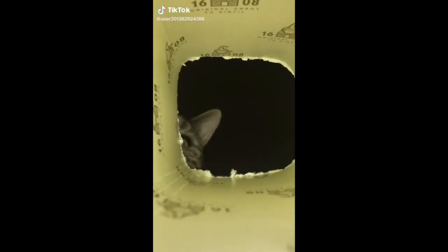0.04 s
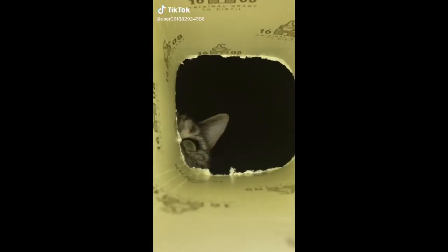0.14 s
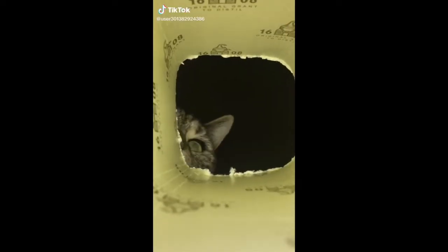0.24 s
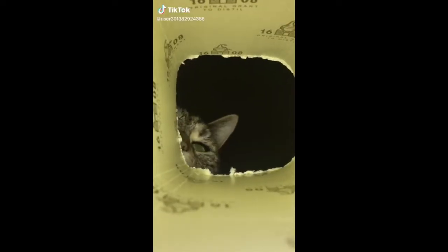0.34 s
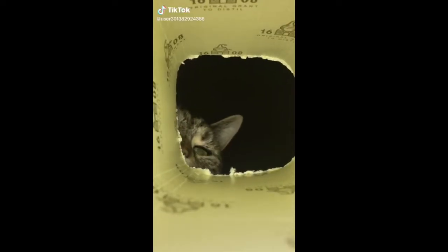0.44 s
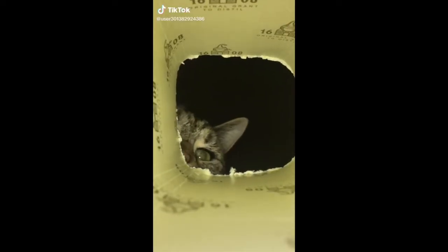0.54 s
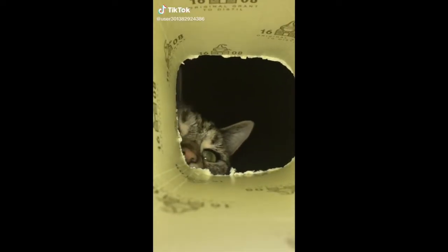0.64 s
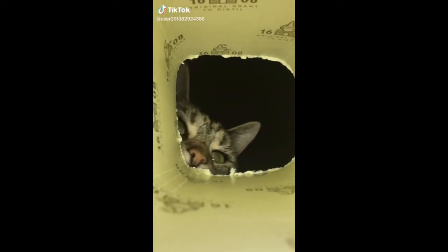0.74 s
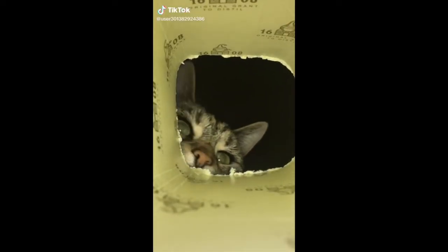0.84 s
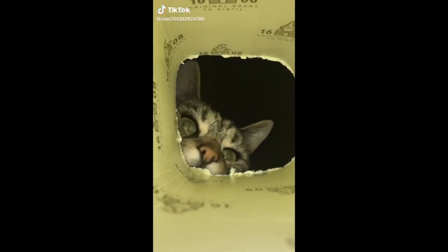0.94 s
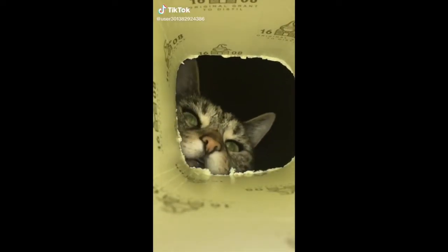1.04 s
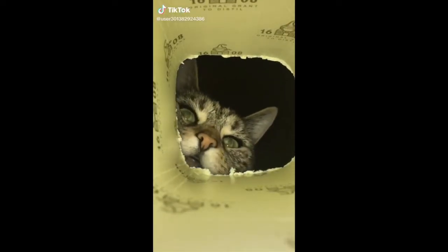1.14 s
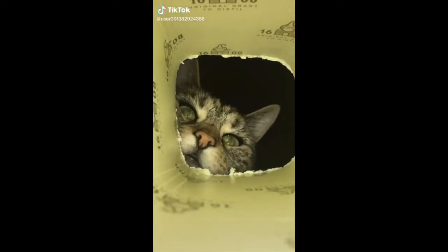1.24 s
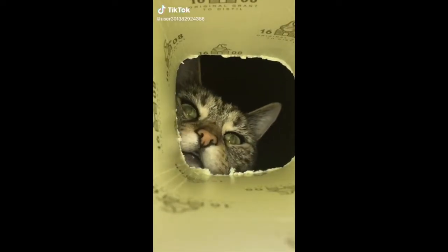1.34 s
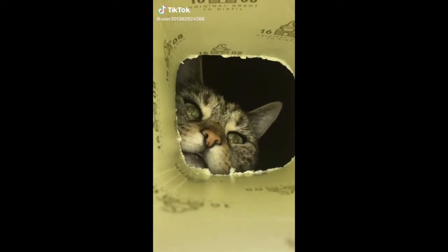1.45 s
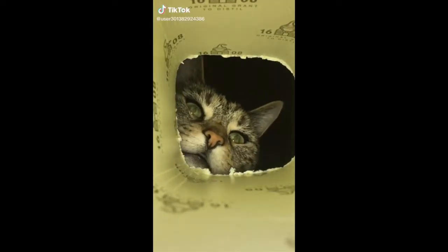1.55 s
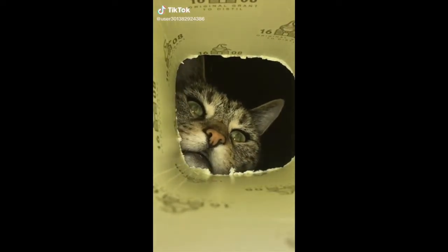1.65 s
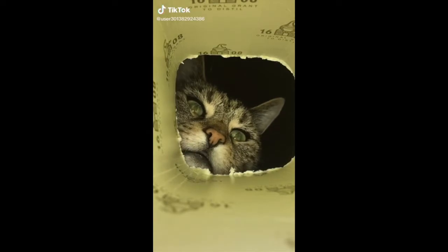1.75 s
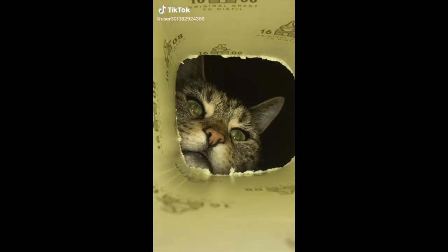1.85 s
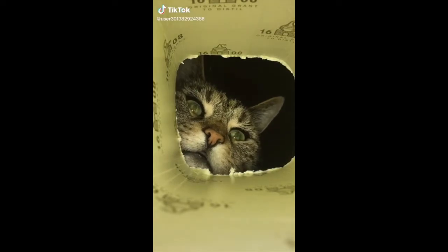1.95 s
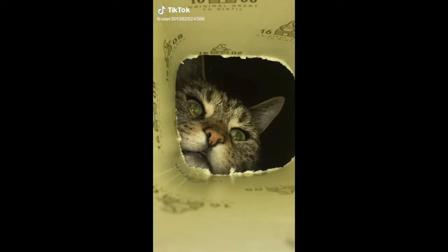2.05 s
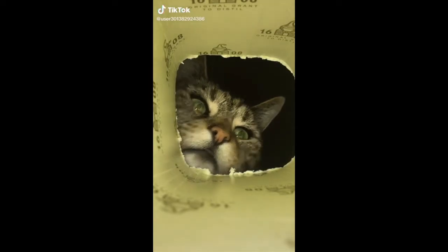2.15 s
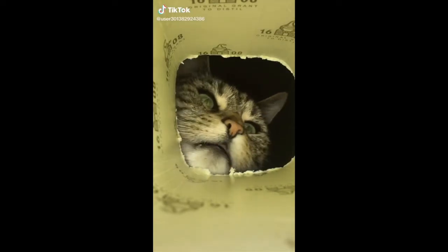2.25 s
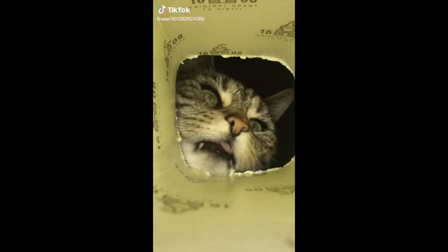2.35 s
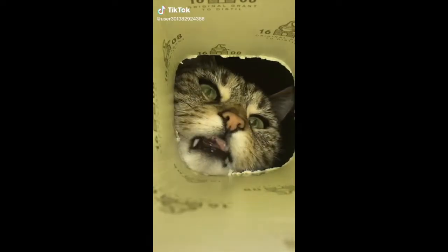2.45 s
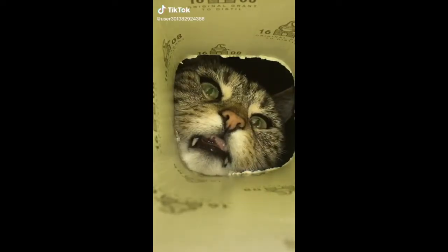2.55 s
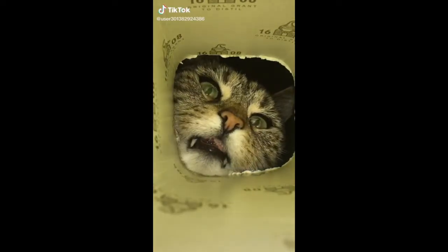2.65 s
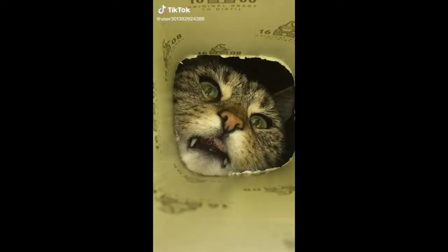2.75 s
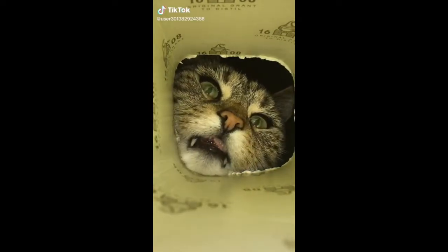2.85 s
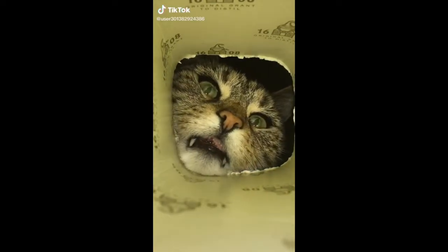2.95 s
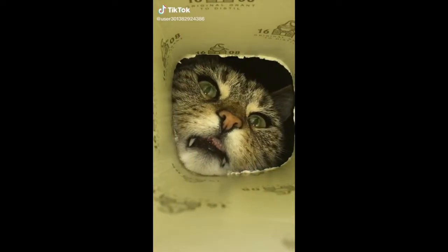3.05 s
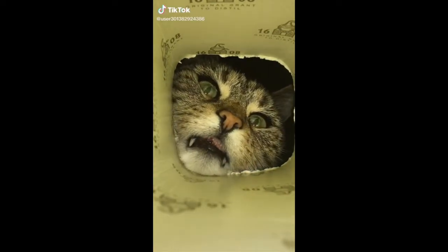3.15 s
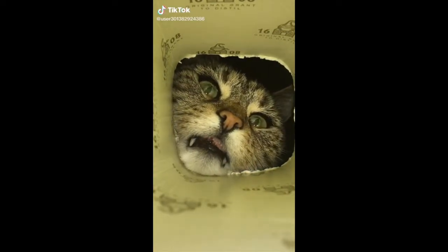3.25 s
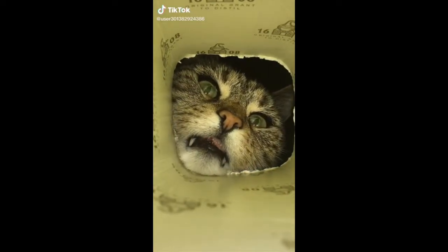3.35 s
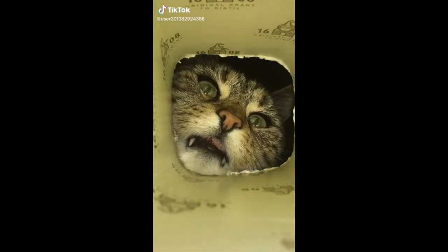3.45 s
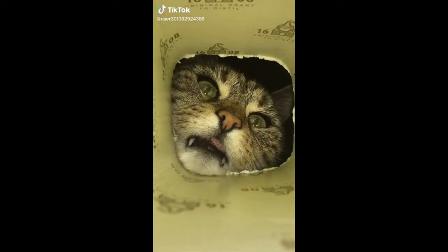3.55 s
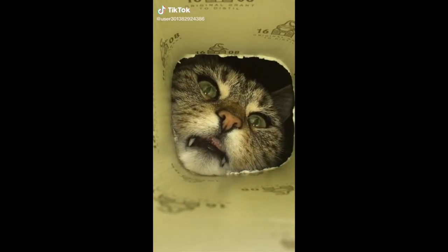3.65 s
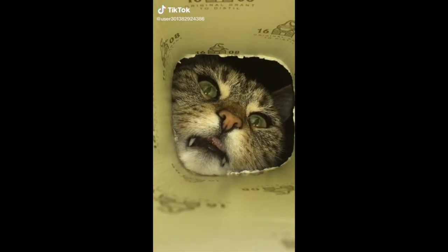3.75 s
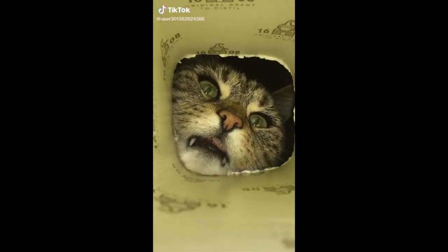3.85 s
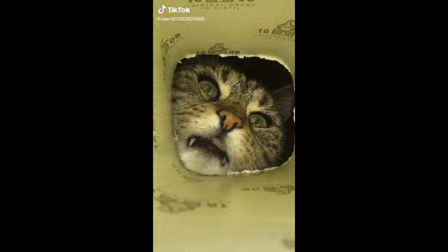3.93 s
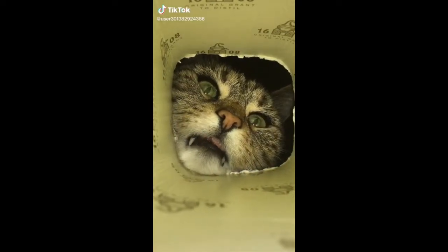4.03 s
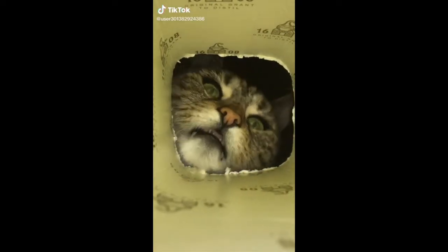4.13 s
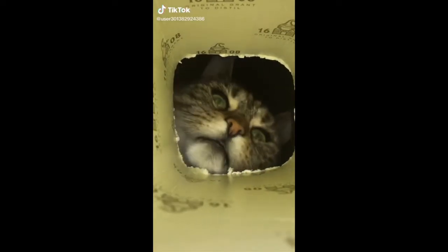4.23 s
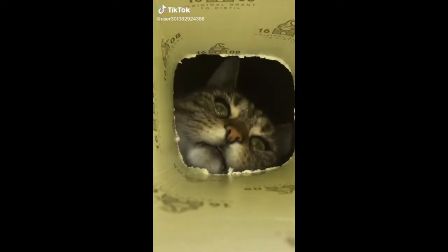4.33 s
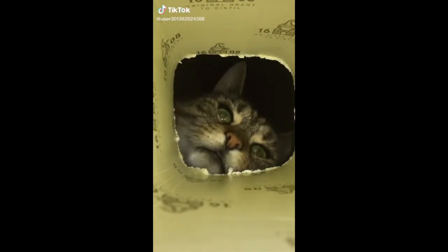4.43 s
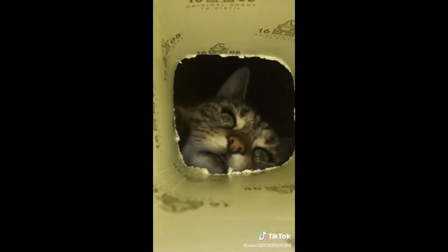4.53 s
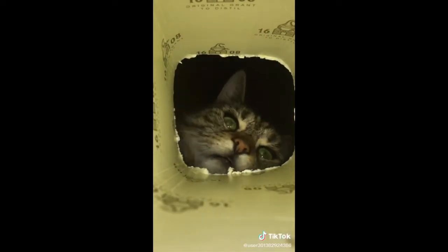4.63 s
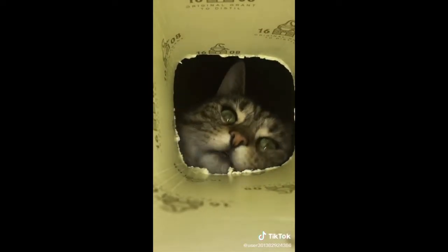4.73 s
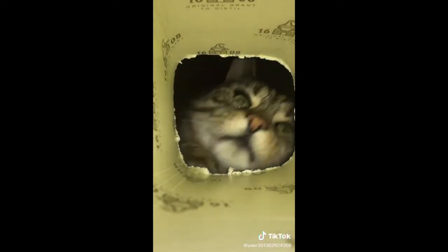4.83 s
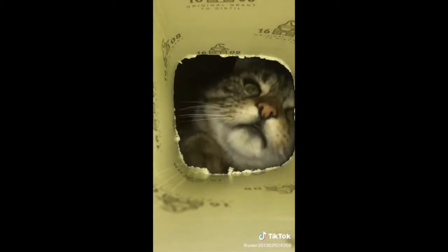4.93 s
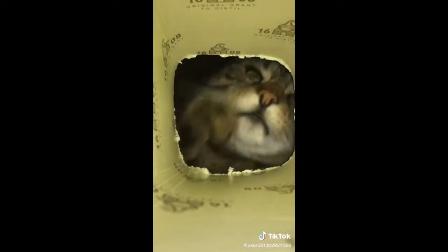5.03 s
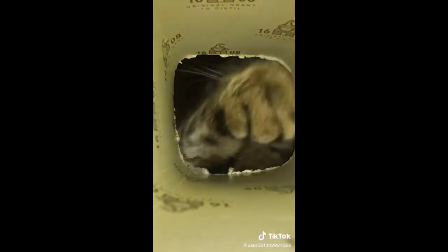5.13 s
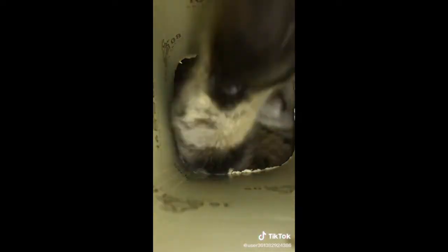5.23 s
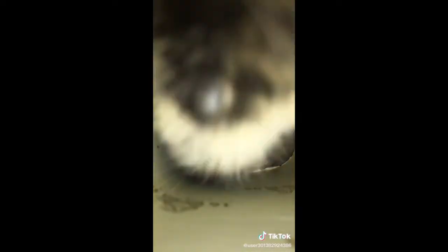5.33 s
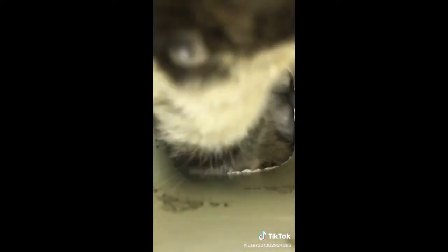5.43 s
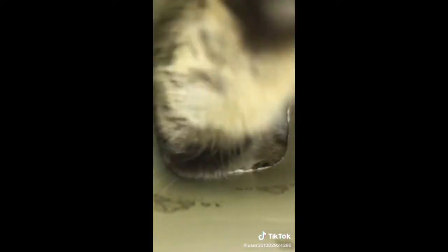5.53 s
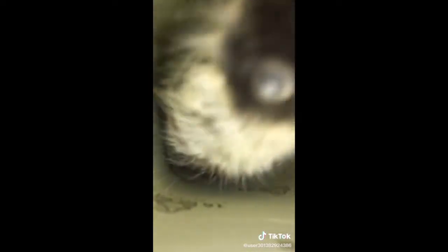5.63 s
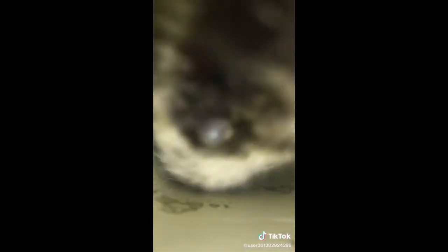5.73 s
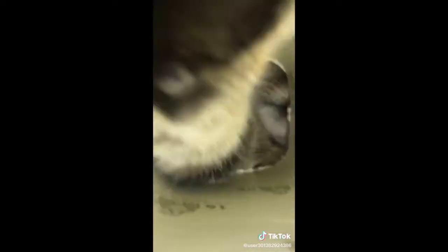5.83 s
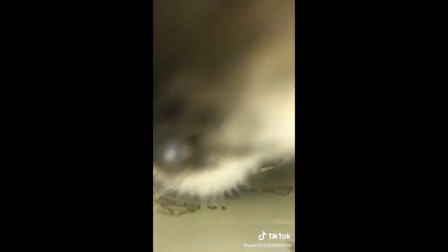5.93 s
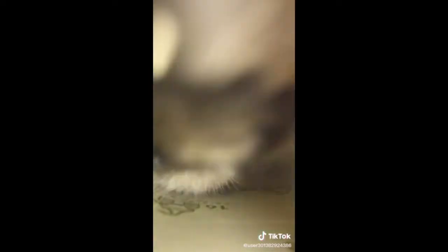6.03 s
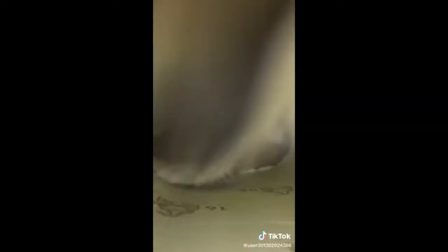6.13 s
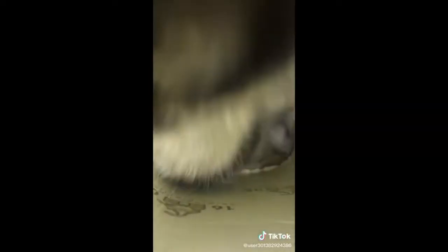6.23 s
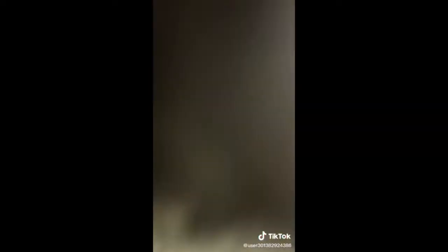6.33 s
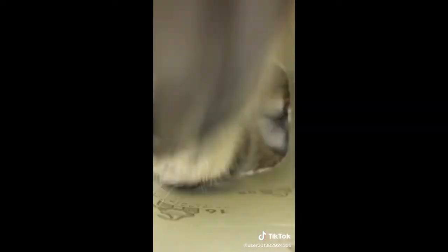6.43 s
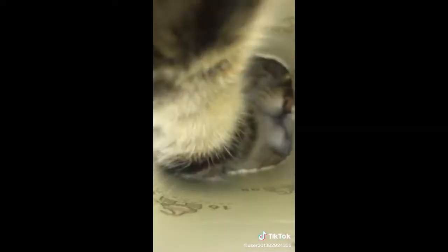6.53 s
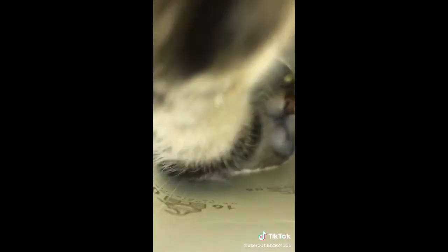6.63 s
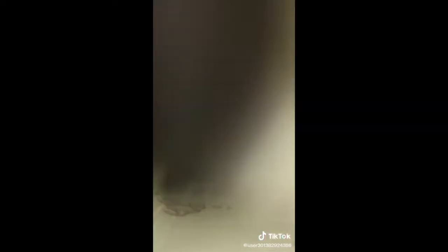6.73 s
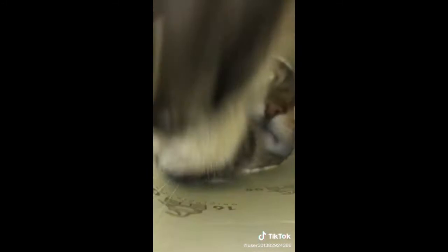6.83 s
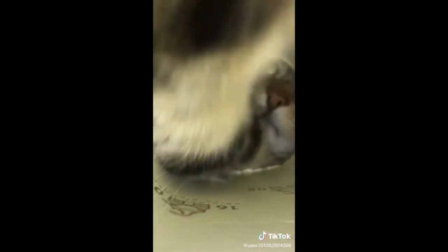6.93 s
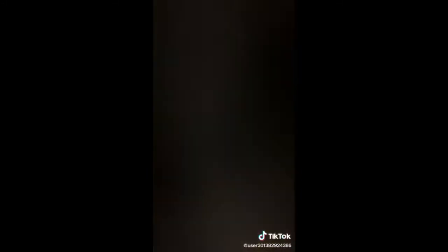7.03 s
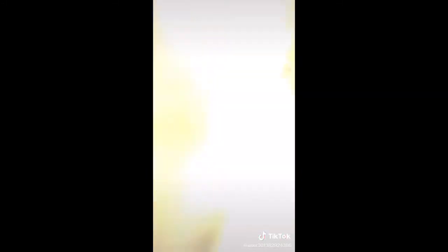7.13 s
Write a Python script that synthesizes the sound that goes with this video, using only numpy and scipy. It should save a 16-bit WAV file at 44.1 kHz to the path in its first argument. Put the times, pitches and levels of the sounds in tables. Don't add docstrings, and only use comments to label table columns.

```python
import sys
import numpy as np
from scipy import signal
from scipy.fft import rfft, irfft, next_fast_len
from scipy.io import wavfile
from scipy.ndimage import uniform_filter1d

SR = 44100
rng = np.random.default_rng(int(sys.argv[2]) if len(sys.argv) > 2 else 0)


def makeup_ratio(level_db):
    decades = np.asarray(level_db, float) / 20
    return 10 ** decades


def materialize(psi):
    bounded = np.clip(np.atleast_2d(psi).T, -1, 1)
    quanta = np.round(bounded * 32767).astype(np.int16)
    wavfile.write(sys.argv[1], SR, quanta)


N = 316638
FFT_SIZE = next_fast_len(N)
TOP_HZ = 13350
BLOCK = 64


def rms_one(x):
    return x / np.sqrt(np.mean(x ** 2) + 1e-20)


def in_time(rows):
    s, *columns = np.transpose(rows)
    return [np.interp(np.arange(N) / SR, s, c) for c in columns]


def band(x, low_hz, high_hz):
    return signal.sosfilt(signal.butter(2, [low_hz, high_hz], "band", fs=SR, output="sos"), x)


def resonance(x, hz, width):
    r = np.exp(-np.pi * width / SR)
    top = (1 - r * r) / 2
    return signal.lfilter([top, 0, -top], [1, -2 * r * np.cos(2 * np.pi * hz / SR), r * r], x)


def ring(x, hz, t60):
    r, w = makeup_ratio(-60 / (t60 * SR)), 2 * np.pi * hz / SR
    return signal.lfilter([0, np.sin(w)], [1, -2 * r * np.cos(w), r * r], x)


def drift(rate):
    r = np.exp(-2 * np.pi * rate / SR)
    noise = rng.standard_normal(N + SR)
    return rms_one(signal.lfilter([1], [1, -2 * r, r * r], noise)[SR:])


def coloured(x, spectrum, peaks=()):
    hz = np.maximum(np.fft.rfftfreq(FFT_SIZE, 1 / SR), 1)
    points = np.array(spectrum)
    db = np.interp(np.log(hz), np.log(points[:, 0]), points[:, 1])
    for peak_hz, width, lift_db in peaks:
        db = db + lift_db / (1 + (2 * (hz - peak_hz) / width) ** 2)
    return irfft(rfft(x, FFT_SIZE) * makeup_ratio(db) * (hz < TOP_HZ), FFT_SIZE)[:N]


def add(out, s, sound, peak_db):
    i = max(round(s * SR), 0)
    piece = sound[:N - i]
    out[i:i + len(piece)] += makeup_ratio(peak_db) * piece / np.max(np.abs(sound))


# pitch_hz, level_db (per Hz)
ROOM_COLOUR = [(20, -16), (40, -2), (82, 4.5), (241, -18), (516, -27), (829, -27.5), (1300, -20),
               (3000, -44.5), (6000, -46), (13800, -45.5)]
# pitch_hz, width_hz, lift_db
BOX_AIR = [(257.6, 86, 7), (457, 56, -6.5), (660, 90, 10), (1347, 220, 4), (2350, 82, 11),
           (2600, 102, 10.5), (3176, 170, 6.5), (3660, 62, 8), (5180, 120, 7), (6840, 1600, 9.5)]


def room():
    air = rms_one(coloured(rng.standard_normal(N), ROOM_COLOUR, BOX_AIR))
    hum_hz, width_hz = 87.5, 27
    hum = resonance(rng.standard_normal(N), hum_hz, width_hz)
    hum = rms_one(resonance(hum, hum_hz, width_hz))
    return air * makeup_ratio(-66 + 2.0 * drift(1.2)) + makeup_ratio(-65) * hum


# start_s, length_s, top_pitch_hz, level_db, pitch_arch (0-1)
SQUEAKS = [
    (0.33, 0.2, 605, -64.5, .3),
    (1.87, 0.14, 380, -63.5, .1),
    (7.115, 0.092, 285, -33.5, .1),
    (6.996, .028, 250, -33.5, 0.11),
    (.24, .06, 250, -55, .1),
]


def squeaks():
    out = np.zeros(N)
    for s, length, hz, db, arch in SQUEAKS:
        along = np.linspace(0, 1, round(length * SR))
        pitch = hz * (1 - arch * (along - .42) ** 2)
        add(out, s, np.sin(np.pi * along) * np.sin(2 * np.pi * np.cumsum(pitch) / SR), db)
    return out


# start_s, peak_db, pitch_hz, ring_s (time to fall 60 dB)
PINGS = [(1.219, -37, 690, 0.037), (4.208, -47.5, 1365, .04), (4.24, -52, 1340, 0.037),
         (4.417, -48, 2360, 0.073), (4.418, -59, 3600, 0.045), (4.47, -58, 2350, 0.041),
         (4.771, -43, 69.9, .12), (4.929, -46, 65.4, 0.14), (5.455, -46, 2400, .012),
         (5.7405, -32, 520, .02), (6.806, -36, 1440, .04), (5.481, -30, 680, .035), (5.648, -23, 650, .025),
         (5.343, -32, 480, .03), (6.115, -33, 700, .015), (5.7955, -13.5, 200, 0.013)]


def pings():
    out, t = np.zeros(N), np.arange(8000) / SR
    for s, db, hz, t60 in PINGS:
        add(out, s, ring(np.exp(-4 * t * hz), hz, t60), db)
    return out


# pitch_hz, level_db, ring_s
PANEL_MODES = [(61.4, -5, 0.055), (100.5, -5.5, 0.079), (141, -1.5, 0.037), (202, -6, 0.042),
               (270.5, 2, 0.041), (376.6, 3.5, 0.024), (616, -2, 0.027)]


def panels(push, centre_hz, spread, free=1):
    out = 0
    for hz, db, t60 in PANEL_MODES:
        distance = spread * np.log2(hz / centre_hz)
        out = out + makeup_ratio(db - distance ** 2) * ring(push, hz, free * t60)
    return out


# start_s, slips_per_s, level_db, unevenness (0-1)
CREAK = [
    (0, 220, -23.5, 1),
    (.014, 230, -25, 0.8),
    (.03, 205, -18, 0.64),
    (.042, 206, -21, 0.25),
    (.055, 213, -19.5, 0.09),
    (.095, 203, -25, 0.02),
    (.105, 172, -36, 0.33),
    (.14, 180, -48, 0.36),
]
# start_s, strength_db
CATCHES = [
    (.0165, 6),
    (.0235, 10),
    (.026, 7),
    (.0325, 9),
    (.038, 5),
    (.040, 8),
    (.0428, 8),
]
# pitch_hz, width_hz, level_db
FLAP_TONE = [(109, 56, -7.5), (273, 152, -1), (403, 41, 5.5), (607, 150, -24), (850, 120, -10),
             (1220, 69, -13.5), (1515, 130, -16.5), (2060, 110, -25), (2320, 65, -19.5), (2635, 43, -22),
             (3240, 540, -26), (6660, 3400, -34.5)]


def creak():
    size = round(CREAK[-1][0] * SR)
    per_s, level_db, uneven = (c[:size] for c in in_time(CREAK))
    wander = signal.lfilter([.01], [1, -.99], rng.standard_normal(size)) * 14
    beats = np.cumsum(per_s * (1 + .5 * uneven * wander)) / SR
    slips = np.diff(np.floor(beats + .995), prepend=0) > 0
    extra = rng.random(size) < 900 * np.clip(uneven, 0, 1) / SR
    clicks = slips * makeup_ratio(5.0 * uneven * rng.standard_normal(size))
    clicks = clicks + extra * rng.standard_normal(size) * 0.8 * uneven
    jolts = 0.5 * slips
    for s, db in CATCHES:
        jolts[round(s * SR)] = makeup_ratio(db)
    grit = rng.standard_normal(size) * signal.lfilter([1], [1, -.995], np.abs(clicks)) * .6
    body = np.zeros(size)
    for k, (hz, width, db) in enumerate(FLAP_TONE):
        source = clicks + 0.39 * (hz > 1000) * grit
        tone = rms_one(resonance(resonance(source, hz, 3 * width), hz, width))
        body += (-1) ** k * makeup_ratio(db) * tone
    body = body + 0.93 * uneven * rms_one(panels(clicks, 220, spread=5.2))
    body = body - 0.16 * rms_one(band(band(jolts, 250, 1430), 150, 1600))
    even = np.sqrt(uniform_filter1d(body ** 2, size=600) + 1e-9)
    stop = np.clip((size - np.arange(size)) / 300, 0, 1)
    return np.pad(makeup_ratio(level_db) * body / even * stop, (0, N - size))


def friction(tone, peaks, per_s, grit_db, flicker_db):
    sizes = makeup_ratio(grit_db * np.minimum(rng.exponential(1, N), 5)) * rng.choice([-1, 1], N)
    clicks = sizes * (rng.random(N) < per_s / SR)
    grains = rfft(coloured(clicks, tone, peaks), FFT_SIZE)
    hz, shared = np.fft.rfftfreq(FFT_SIZE, 1 / SR), drift(25)
    low = 1 / (1 + (hz / 870) ** 6)
    high = 1 / (1 + (4600 / (hz + 1)) ** 8)
    ranges = []
    for share in (1 - low - high, high, low):
        flicker = makeup_ratio(flicker_db * (shared + drift(37)))
        ranges.append(rms_one(irfft(grains * share, FFT_SIZE)[:N] * flicker))
    return ranges


def patchy(x, lean_db, patch_db):
    hz, spectrum = np.fft.rfftfreq(FFT_SIZE, 1 / SR) + 1, rfft(x, FFT_SIZE)
    centres = np.linspace(np.log(800), np.log(5000), 12)
    total, power = 0, 0
    for one, side in zip(np.eye(12), np.linspace(-1, 1, 12)):
        part = irfft(spectrum * np.interp(np.log(hz), centres, one), FFT_SIZE)[:N]
        gain = makeup_ratio(lean_db * side + patch_db * drift(9.6))
        total = total + gain * part
        power = power + gain ** 2 * np.mean(part ** 2)
    return rms_one(total / np.sqrt(power))


def swells(rows):
    start, firm, end, db = (c[:, None] for c in np.transpose(rows)[:4])
    t = np.arange(0, N + BLOCK, BLOCK) / SR
    before = (firm - t) / np.maximum(firm - start, 1e-3)
    after = (t - firm) / np.maximum(end - firm, 1e-3)
    away = np.maximum(before, after)
    fade_db = 27 * np.minimum(away, 4) ** 1.71
    lift_db = 58 * np.clip(away - 1, 0, 1)
    return makeup_ratio(db - fade_db - lift_db)


def together(gains):
    coarse = np.sqrt(np.sum(np.square(gains), axis=0))
    return np.interp(np.arange(N) / BLOCK, np.arange(len(coarse)), coarse)


# start_s, firmest_s, end_s, level_db
SHIFTS = [(.08, .17, 0.47, -53.5), (.8, .97, 1.057, -50), (1.61, 1.66, 1.8, -58), (2.24, 2.36, 2.57, -48),
          (2.45, 2.54, 2.68, -53), (2.82, 2.86, 2.98, -57), (3.45, 3.7, 4.1, -56), (3.92, 4.0, 4.24, -47),
          (4.4, 4.46, 4.6, -52), (4.72, 4.78, 4.9, -54), (4.87, 4.91, 5.03, -55.5), (5.3, 5.35, 5.42, -46),
          (6.03, 6.06, 6.24, -40), (7.05, 7.17, 8.4, -40)]


def pressure(strokes, stir_db, rumble_db, shake_db):
    each, blows = swells(strokes), np.zeros(N)
    for s, db, *_ in [*KNOCKS, *THUMPS]:
        blows[round(s * SR)] = makeup_ratio(2 * (db + shake_db))
    shudder_s = 0.039
    shudder = signal.lfilter([1], [1, -np.exp(-2 / (shudder_s * SR))], blows)
    rub = np.sqrt(together(each) ** 2 + makeup_ratio(2 * -21.5) * shudder)
    hiss = together(each * makeup_ratio(np.transpose(strokes)[4])[:, None])
    shaking = together(each * makeup_ratio(rumble_db)) ** 2
    rumble = np.sqrt(shaking + together(swells(SHIFTS)) ** 2 + shudder)
    return [np.hypot(gain, makeup_ratio(db)) for gain, db in zip((rub, hiss, rumble), stir_db)]


# pitch_hz, level_db (per Hz)
INSIDE_COLOUR = [(60, -34), (130, -1.5), (372, -0.5), (900, -16), (1300, -10), (1800, -18), (2600, -16),
                 (4000, -20.5), (5800, -34), (9000, -26.5), (13300, -30)]
# pitch_hz, level_db (per Hz)
NEAR_COLOUR = [(21, -42), (35, 4.5), (70, 1.5), (268, 1.5), (819, -14), (1900, -9), (2500, -12.5),
               (2980, -9.5), (9560, -12.5), (13200, -19.5)]
# pitch_hz, width_hz, lift_db
COVERED_HOLE = [(313, 82, 5), (630, 180, 10), (1440, 190, 4.5), (2880, 440, 4), (4400, 270, 4.5),
                (5100, 1300, -4.5), (6580, 510, 4)]
# start_s, firmest_s, end_s, level_db, hiss_db (against the level)
STROKES_INSIDE = [ (.101, .166, 0.18, -62.5, -5), (.151, .251, 0.42, -75, -17),
                  (.761, .861, 1.05, -58.5, -8), (.851, .961, 1, -59, -34), (.981, 1.101, 1.58, -67, -1),
                  (1.201, 1.401, 1.72, -59.5, -8), (1.451, 1.591, 1.64, -59.5, -9),
                  (1.641, 1.771, 1.87, -69, -11), (1.801, 1.951, 2.23, -74, -8),
                  (1.991, 2.141, 2.345, -53.5, -7), (2.241, 2.411, 2.652, -49.5, -6),
                  (2.722, 2.861, 3.08, -74, -7), (3.444, 3.457, 3.51, -71.5, -3),
                  (3.931, 3.976, 4.5, -58.5, -2), (4.001, 4.211, 4.28, -59.5, -8),
                  (4.461, 4.556, 4.45, -61, -7), (4.521, 4.616, 4.66, -51, 4), (4.671, 4.701, 3.6, -73, -3),
                  (4.716, 4.786, 4.86, -56, -2.5), (4.871, 4.941, 5, -61.5, -10.5),
                  (4.971, 5.051, 4.9, -62, 5.5)]
# start_s, firmest_s, end_s, level_db, hiss_db (against the level)
STROKES_NEAR = [(5.03, 5.07, 5.17, -54.5, -3.5), (5.09, 5.15, 5.32, -36, -10),
                (5.15, 5.25, 5.25, -43, -7.5), (5.31, 5.335, 5.38, -52, -4), (5.325, 5.36, 5.43, -52, -12),
                (5.405, 5.415, 5.54, -49.5, -1.5), (5.46, 5.5, 5.565, -41, -16.5),
                (5.47, 5.53, 5.74, -57, -8), (5.53, 5.63, 5.675, -41.5, -6.5),
                (5.766, 5.774, 5.76, -47, 2.5), (5.63, 5.68, 5.8, -54.5, -19),
                (5.77, 5.83, 5.91, -43.5, -5.5), (5.84, 6.01, 6.08, -43.5, -1),
                (6.02, 6.05, 6.12, -52.5, -6.5), (6.16, 6.18, 6.39, -40, -5), (6.19, 6.27, 6.38, -38.5, -5),
                (6.415, 6.425, 6.3, -55, -9), (6.43, 6.48, 6.4, -47.5, -5), (6.5, 6.54, 6.795, -40, -6.5),
                (6.54, 6.64, 6.715, -41.5, -8), (6.66, 6.72, 6.78, -66, -12), (6.8, 6.806, 6.85, -48, -6.5),
                (6.82, 6.885, 6.94, -38, -1), (6.87, 6.93, 7.02, -42, -7), (7.0, 7.07, 7.1, -53.5, -4.5),
                (6.88, 6.99, 7.05, -44.5, -8), (7.08, 7.13, 7.66, -45.5, -5)]


def fur():
    t = np.arange(N) / SR
    inside = friction(INSIDE_COLOUR, BOX_AIR, per_s=13000, grit_db=2.0, flicker_db=1.59)
    near = friction(NEAR_COLOUR, COVERED_HOLE, per_s=5000, grit_db=0.5, flicker_db=1.0)
    inside_gains = pressure(STROKES_INSIDE, stir_db=(-81, -85.5, -65), rumble_db=-5, shake_db=-35.5)
    near_gains = pressure(STROKES_NEAR, stir_db=(-67, -75, -50), rumble_db=-7, shake_db=-23)
    lean_db = 2 + 0.97 * 20 * np.log10(near_gains[1] / near_gains[0])
    near[0] = patchy(near[0], lean_db, patch_db=4.0)
    inside[0] = patchy(inside[0], 0, patch_db=3.0)
    inside_part = sum(gain * x for gain, x in zip(inside_gains, inside))
    near_part = sum(gain * x for gain, x in zip(near_gains, near))
    begin = np.clip((t - .08) / 0.043, 0, 1)
    paw_out = np.clip((t - 5.045) / .02, 0, 1)
    return (1 - paw_out) * begin * inside_part + paw_out * near_part


# start_s, firmest_s, end_s, level_db, pitch_hz
RAKES = [(0.87, .95, 1, -57, 940), (2.05, 2.19, 2.17, -56, 1300), (1.44, 1.477, 1.57, -73, 5100),
         (3.938, 3.945, 3.965, -56, 3250), (3.936, 3.939, 3.86, -56, 1450), (4.08, 4.2, 4.1, -61, 2560),
         (4.85, 4.93, 5.04, -59.5, 850), (5.311, 5.313, 5.33, -45, 3300), (5.305, 5.33, 5.338, -42.5, 4000),
         (5.478, 5.484, 5.51, -40, 910), (5.486, 5.495, 5.53, -45, 1340), (5.48, 5.54, 5.5, -51, 3300),
         (5.81, 5.822, 5.92, -45.5, 3900), (5.335, 5.343, 5.36, -48, 4200), (7.05, 7.055, 7.075, -53, 2330),
         (0.78, 0.836, 0.97, -63.5, 3230), (5.934, 5.992, 6.07, -48, 4280), (6.165, 6.186, 6.35, -38, 4000),
         (6.18, 6.246, 6.13, -35.5, 3250), (6.247, 6.32, 6.36, -41, 1270),
         (6.513, 6.556, 6.74, -41.5, 3620), (6.673, 5.6, 7, -65, 2100), (6.829, 6.86, 6.94, -38.5, 3170),
         (6.843, 6.883, 6.93, -38.5, 4200), (6.898, 6.94, 7.16, -53, 2200), (6.977, 7.001, 6.4, -43, 1518),
         (6.2, 6.27, 6.37, -44, 6800), (4.52, 4.615, 4.645, -57, 2914), (4.53, 4.6, 4.66, -53, 345),
         (5.15, 5.26, 5.32, -48.5, 126), (5.1, 5.17, 5.29, -46, 1000), (5.56, 5.615, 5.65, -47, 1980),
         (5.52, 5.57, 5.64, -57.5, 4100), (6.9, 6.96, 7.1, -53, 4300), (6.83, 6.86, 6.91, -43, 92),
         (3.62, 3.74, 3.84, -57, 270), (3.19, 3.29, 3.36, -58.5, 296), (4.38, 4.42, 4.47, -59.5, 790)]


def rakes():
    more_snaps = rng.standard_normal(N) * (rng.random(N) < 4000 / SR) * makeup_ratio(1.9 * drift(64))
    out = np.zeros(N)
    for gain, (*_, hz) in zip(swells(RAKES), RAKES):
        i, j = np.clip(BLOCK * np.flatnonzero(gain > 1e-5)[[0, -1]], 0, N)
        edges = hz / 1.224, hz * 1.224
        out[i:j] += together([gain])[i:j] * rms_one(band(band(more_snaps[i:j], *edges), *edges))
    return out


def fibre_snaps(rows):
    out, t = np.zeros(N), np.arange(2000) / SR
    for (s, db, hz, top_db), noise in zip(rows, rng.standard_normal((len(rows), 2000))):
        body = band(noise * np.exp(-t * hz / 3.16), 0.25 * hz, 1.37 * hz)
        top = band(noise * np.exp(-t / 0.0015), 3100, 9600)
        add(out, s, band(body, 240, 7700), db)
        add(out, s, band(top, 3800, 12500), db + min(top_db, 0))
    return out


# start_s, peak_db, pitch_hz, top_db (against the
MORE_SNAPS = [(.98, -55, 3000, -10), (1.098, -62, 3500, -6), (1.402, -56, 2100, -10), (3.463, -55, 2100, -8),
              (3.489, -53, 920, -25), (4.241, -60, 1430, -4), (5.3116, -40, 2510, -10), (5.3934, -47, 1400, -14),
              (5.4109, -42, 1700, 0), (5.4967, -38, 1410, -14), (5.5934, -38, 3100, -8), (5.649, -32, 1500, 0),
              (5.7386, -40, 1198, -10), (6.1133, -40, 999.4, -27), (6.9, -32.5, 2700, 0),
              (6.5268, -44, 1300, -10), (6.9945, -34.5, 1200, -20), (7.1085, -36, 2080, -10),
              (6.5, -46, 4000, 0), (5.4795, -42, 2600, -14), (5.4925, -38, 1100, -15), (5.801, -38, 3000, -8),
              (5.771, -36, 3000, -6), (7.4, -44, 3000, 0), (7.026, -42, 2000, -10), (6.047, -35, 1340, -15),
              (5.3405, -38, 4300, -6), (3.8, -47.5, 620, -22)]


def more_snaps():
    return fibre_snaps(MORE_SNAPS)


# start_s, peak_db, pitch_hz, top_db (against the peak)
CLAWS = [(3.9386, -54, 2600, -7), (5.2739, -19, 1920, -10), (5.3398, -27, 1440, -13),
         (5.4347, -16, 1250, -41), (5.6367, -19.5, 1390, -8.5), (5.682, -46, 3500, 0),
         (5.6977, -52, 1160, -16), (5.7754, -20, 1380, -20), (5.7955, -26, 1301, -8.5),
         (5.8147, -22.5, 1680, -4.5), (6.13, -24.5, 1740, -14), (6.1602, -22.5, 1070, -7),
         (6.4107, -33, 1100, 17.5), (6.4234, -16.5, 3100, -8), (6.4608, -16.5, 1070, -3),
         (6.6794, -29.5, 1045, -25), (6.805, -35, 1355, -5), (6.812, -31.5, 1440, -13),
         (6.8566, -29, 3170, -11), (6.985, -25.5, 1216, -33)]


def claws():
    return fibre_snaps(CLAWS)


# pitch_hz, level_db, ring_s
BOARD_MODES = [(640, -1.5, 0.033), (805, -1, 0.018), (1310, 11, 0.015), (1700, 4, 0.008), (2215, 13, 0.016),
               (2510, 9.5, 0.018), (3750, 6, 0.0056)]


def board(click, luck):
    modes = sum(makeup_ratio(db + 1.1 * z) * ring(click, hz, t60) for (hz, db, t60), z in zip(BOARD_MODES, luck))
    return band(modes + 1.4 * band(click, 1000, 2500), 200, 2600)


def torn_edge(noise):
    return band(noise, 5000, 9700) * np.exp(-np.arange(len(noise)) / SR / 0.003)


# start_s, peak_db, pitch_hz, tick_db (against the peak)
KNOCKS = [(0.138, -27.5, 230, -35), (0.152, -31.5, 237, -36), (0.42, -40.5, 270, -25),
          (0.643, -43.5, 237, -20), (1.217, -20, 256, -25), (2.349, -31, 237, -22),
          (2.373, -12, 202, -27.5), (2.722, -5, 289.4, -18.5), (2.7915, -8, 300, -20.5),
          (2.8274, -15, 280, -23.5), (3.451, -27, 226, -38), (3.489, -32.5, 250, -32),
          (3.95, -35, 139, -21), (3.972, -23.5, 151, -25), (3.978, -38, 98, -15), (4.027, -21, 203.5, -45),
          (4.061, -27.5, 161, -40), (4.094, -32.5, 157, -22), (4.108, -36, 91.5, -16),
          (4.416, -33, 164, -26), (5.337, -27, 430, -28), (5.654, -22.5, 170, -40),
          (5.696, -25.5, 573, -34), (5.741, -21, 173, -28), (6.112, -20.5, 167, -41),
          (6.641, -25.5, 330, -38), (6.746, -33, 225, -42), (6.749, -31.5, 83.79, -46),
          (6.844, -17.5, 265, -30), (6.904, -26.5, 341.3, -17)]
# start_s, peak_db
EDGE_SNAPS = [
    (0.155, -48.5),
    (2.373, -35.5),
    (3.972, -45),
    (5.697, -37),
    (6.641, -50),
    (6.844, -52),
    (6.905, -44),
]


def knocks():
    size = 5000
    out, t = np.zeros(N), np.arange(size) / SR
    luck = rng.standard_normal((len(KNOCKS), len(BOARD_MODES)))
    hiss = rng.standard_normal((len(KNOCKS), size))
    for (s, db, hz, tick_db), z, noise in zip(KNOCKS, luck, hiss):
        push = np.sin(2 * np.pi * np.clip(t * hz * 1.56, 0, 1))
        click = t * np.exp(-t / 0.00006) + 0.018 * noise * t * np.exp(-t / 0.00092)
        add(out, s + 0.00254, panels(push, hz, spread=4.84), db)
        add(out, s + 0.0014, board(click, z), db + tick_db + 10.5)
        add(out, s + 0.000987, torn_edge(noise), db + tick_db - 17)
    for (s, db), noise in zip(EDGE_SNAPS, hiss[::-1]):
        add(out, s, torn_edge(noise), db)
    return out


# start_s, peak_db, pitch_hz, tick_db (against the peak), contact_s
THUMPS = [(5.428, -8, 250, -13, 0.01085), (5.453, -26.5, 194, 1, 0.012), (5.481, -35, 660, -8, 0.028),
          (5.636, -13, 381.2, -24, 0.014), (5.654, -23, 268.6, -17, 0.014), (5.771, -5, 180, -43, 0.016),
          (5.785, -9.5, 110, -31, 0.0089), (5.814, -28, 242, -10, 0.01632), (6.041, -28.5, 300, 5, 0.013),
          (6.059, -28, 84, -36, 0.011), (6.125, -19.5, 268, -27, 0.01), (6.16, -20.5, 640, -28, 0.009),
          (6.408, -16, 159.1, -20, 0.016), (6.424, -23, 246, -16, 0.012), (6.457, -20, 124, -18, 0.0205),
          (6.549, -29.5, 249, 3, 0.013), (6.756, -33.5, 230, -35, 0.0093), (6.802, -32.5, 650, 8, 0.013),
          (6.991, -31.5, 292, 8, 0.025), (7.107, -32, 273, 3, 0.011), (7.139, -44, 292.2, -8, 0.012)]


def thumps():
    size = 7000
    out, t = np.zeros(N), np.arange(size) / SR
    luck = rng.standard_normal((len(THUMPS), len(BOARD_MODES)))
    hiss = rng.standard_normal((len(THUMPS), size))
    for (s, db, hz, tick_db, contact), z, noise in zip(THUMPS, luck, hiss):
        release = np.clip((max(contact, .002) - t) / 0.0014 + 1, 0, 1)
        shape = np.clip(t / 0.0026, 0, 1) * release
        push = band(noise, 0.45 * hz, 1950) * shape
        add(out, s, panels(push, hz, spread=2.1, free=0.76), db)
        add(out, s, board(noise * shape * np.exp(-t / 0.0033), z), db + tick_db - 12.0)
    return out


def scene():
    background = room() + squeaks() + pings() + creak()
    rubbing = fur() + rakes() + more_snaps()
    paws = claws() + knocks() + thumps()
    return (background + rubbing + paws)[None]


def top_cut(x):
    return signal.sosfilt(signal.butter(12, 14290, fs=SR, output="sos"), x)


def record(dry):
    thin = signal.sosfilt(signal.butter(2, 45.4, "high", fs=SR, output="sos"), dry)
    thin = signal.sosfilt(signal.cheby2(10, 30, TOP_HZ + 700, fs=SR, output="sos"), thin)
    mix = .45 * np.tanh(thin / 0.47)
    return top_cut(mix)


dry = scene()
out = record(dry)
materialize(out)
```